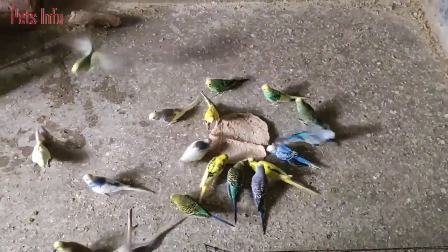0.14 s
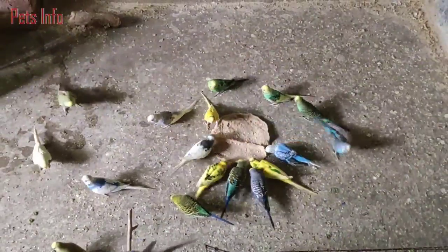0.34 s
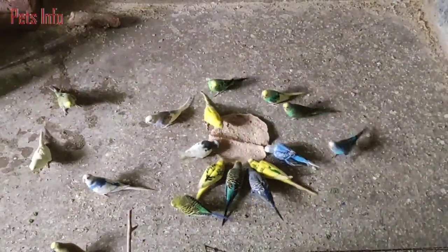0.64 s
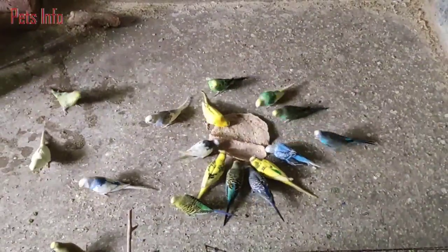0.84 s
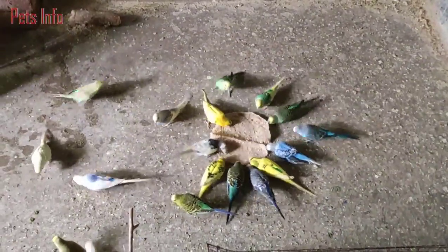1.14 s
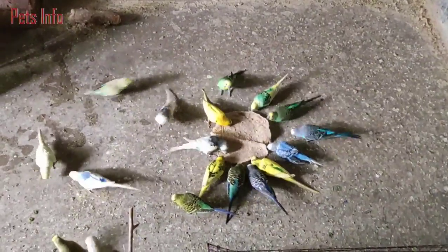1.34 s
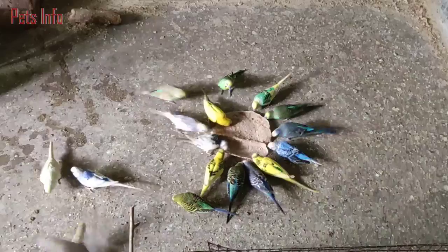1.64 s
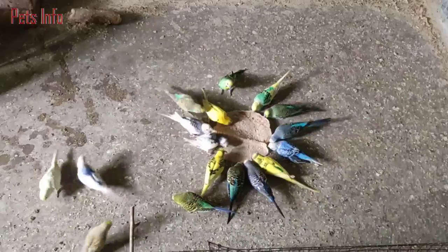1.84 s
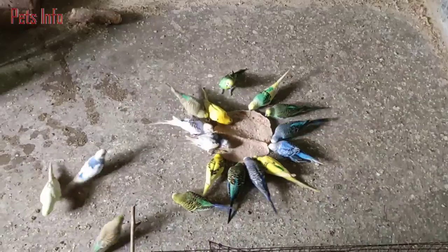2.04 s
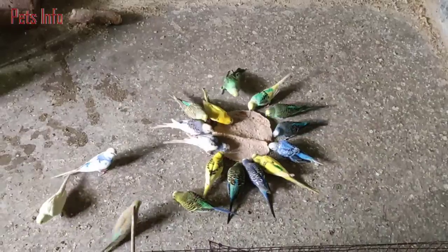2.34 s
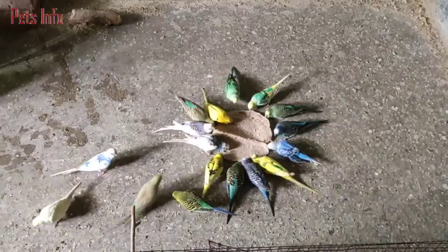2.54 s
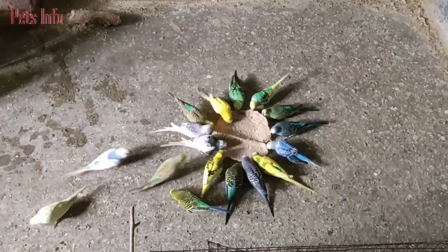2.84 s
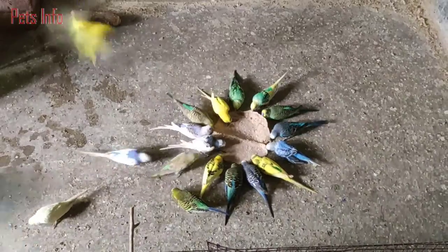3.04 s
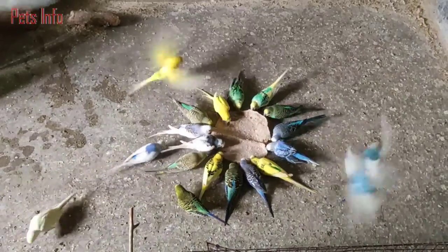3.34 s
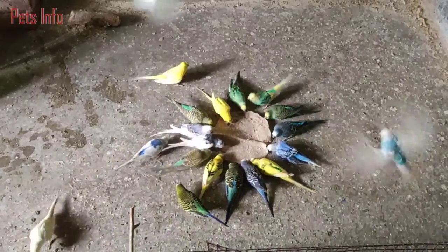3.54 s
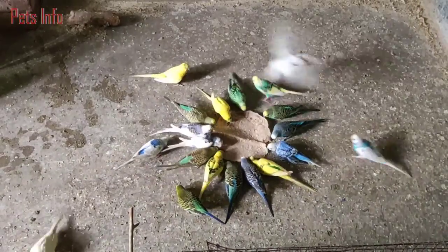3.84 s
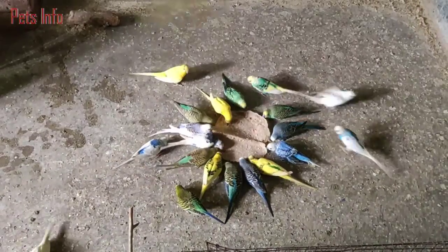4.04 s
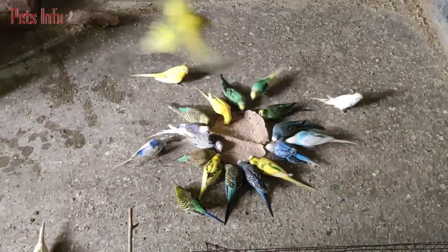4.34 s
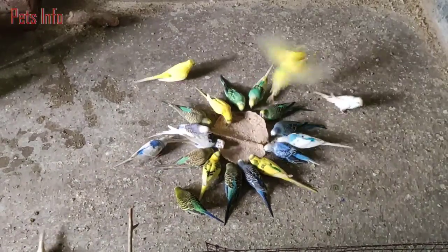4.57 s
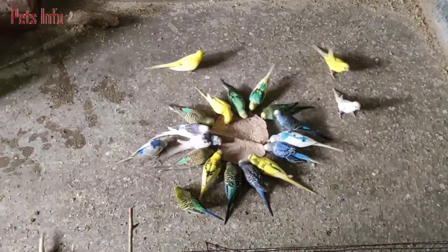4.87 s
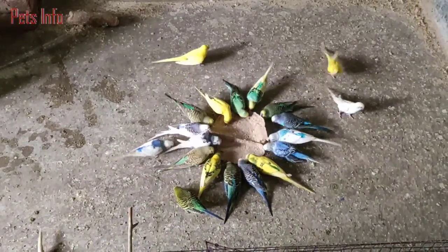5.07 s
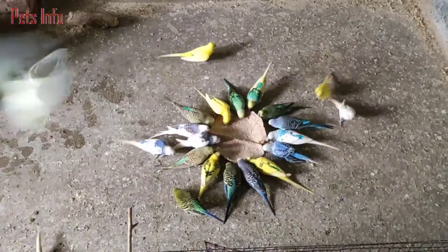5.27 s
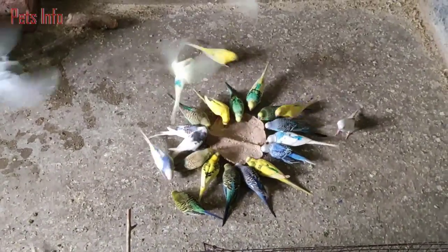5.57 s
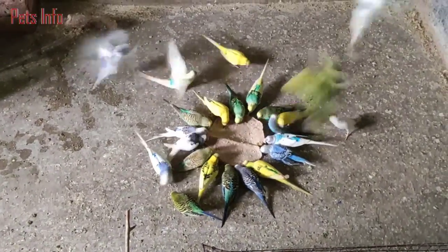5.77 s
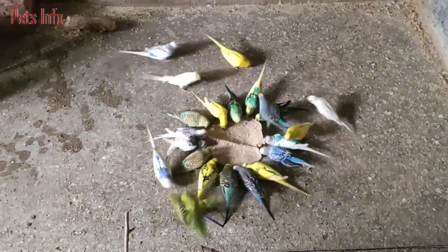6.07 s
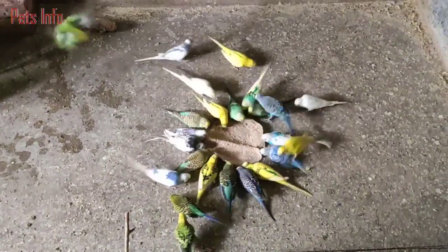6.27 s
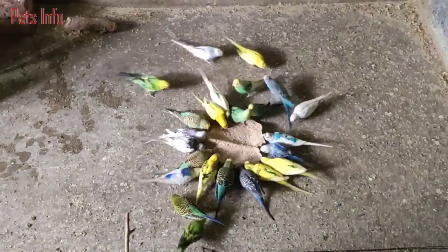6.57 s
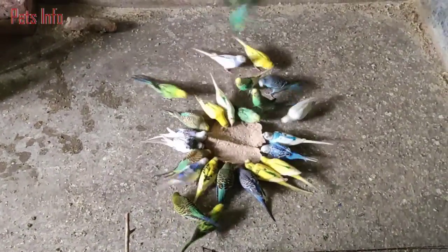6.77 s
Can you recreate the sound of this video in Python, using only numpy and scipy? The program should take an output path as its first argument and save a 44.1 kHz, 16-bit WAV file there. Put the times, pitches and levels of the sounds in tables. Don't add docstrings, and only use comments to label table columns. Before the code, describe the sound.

A flock of small parrots chirps, chatters and squawks in a hard-walled concrete room, with low wing flutter and one close wingbeat gust.

```python
import sys
import numpy as np
from scipy import signal
from scipy.io import wavfile
from scipy.ndimage import uniform_filter1d

SR = 44100
rng = np.random.default_rng(int(sys.argv[2]) if len(sys.argv) > 2 else 0)


def gain_from_db(level_db):
    decades = np.asarray(level_db, float) / 20
    return 10 ** decades


def dump_mix(stems):
    frames = np.atleast_2d(stems).T
    limited = np.clip(frames, -1, 1)
    pcm = np.round(limited * 32767).astype(np.int16)
    wavfile.write(sys.argv[1], SR, pcm)


N = 304731

# t/s, room drive level/dB, feather rush level/dB, lean towards the upper modes/dB
WING_ACTIVITY = [(0.0, -39, -34.5, -7), (0.33, -34, -39, 1.5), (0.71, -30, -39.5, -9),
                 (1.48, -32, -42.5, -10.5), (2.0, -37, -41.5, 2), (3.12, -33.5, -44, -2.5),
                 (3.41, -45, -46.5, 4), (3.85, -42.5, -45, -0.5), (4.0, -37.5, -47, -5),
                 (4.2, -32, -46.5, 1), (4.68, -44, -46.5, 0), (4.98, -43.5, -51.5, -3),
                 (5.7, -44.5, -44.5, -1.5), (6.74, -65, -49.5, 3.5), (6.91, -57, -53.5, 2)]


def evened(x):
    return x / np.sqrt(np.mean(x ** 2) + 1e-20)


def read(points, hz):
    f, value = np.transpose(points)
    return np.interp(np.log(hz + 1), np.log(f + 1), value)


def curve(rows, column):
    rows = np.array(rows)
    return gain_from_db(np.interp(np.arange(N) / SR, rows[:, 0], rows[:, column]))


def add(mix, s, sound, pan_db):
    part = mix[:, round(s * SR):][:, :len(sound)]
    part += sound[:part.shape[1]] * gain_from_db(np.array([[pan_db / 2], [-pan_db / 2]]))


def resonate(x, hz, width):
    r = np.exp(-np.pi * width / SR)
    return 2 * signal.lfilter([1 - r], [1, -r * np.exp(2j * np.pi * hz / SR)], x + 0j).real


def wander(size, span):
    return evened(uniform_filter1d(uniform_filter1d(rng.standard_normal(size), span), span))


def air(spectrum, patchy_db):
    # f/Hz, left-right correlation
    likeness = [(60, .84), (290, .8), (640, .5), (1400, -.1), (15000, 0)]
    frames, hz = N // 512 + 5, np.fft.rfftfreq(2048, 1 / SR)
    a, b, c, d, patches = rng.standard_normal((frames, 1025, 5), dtype=np.float32).T
    patches = evened(uniform_filter1d(uniform_filter1d(patches, 24, 0), 6, 1))
    same = np.clip(read(likeness, hz), -1, 1)[:, None]
    left = a + 1j * b
    right = same * left + np.sqrt(1 - same ** 2) * (c + 1j * d)
    z = np.array([left, right]) * gain_from_db(read(spectrum, hz)[:, None] + patchy_db * patches)
    return evened(signal.istft(z, nperseg=2048, noverlap=1536)[1][:, :N])


def note(length, start_hz, end_hz, wobble, trill):
    size = round((length + .006) * SR)
    hz = np.linspace(start_hz, end_hz, size) * (1 + wobble * wander(size, 90))
    phase = 2 * np.pi * np.cumsum(hz) / SR
    press = gain_from_db(6.0 * (np.clip(start_hz, 3200, 4700) - 3200) / 1000)
    harmonics = gain_from_db(-24) * np.sin(2 * phase) + gain_from_db(-30) * np.sin(3 * phase)
    tone = np.sin(phase) + press * harmonics
    swell = np.interp(np.arange(size) / size, [0, .22, 1 - .31, 1], [0, 1, 1, 0])
    return tone * (1 + trill * wander(size, 60)) * swell


def walls(x, lag, direct_db):
    # f/Hz, reverberation time t60/s
    decay_times = [(1000, 1.7), (4000, 0.65), (8000, 0.56), (15000, 0.17)]
    taps, first, onset_s = np.zeros((2, SR)), 200, 0.0013
    at = np.arange(first, SR - 20, 20) + rng.integers(0, 20, (2, (SR - 21 - first) // 20 + 1))
    np.put_along_axis(taps, at, rng.choice([-1., 1.], at.shape), 1)
    hz, t, z = signal.stft(taps, SR, nperseg=256)
    tail = signal.istft(z * gain_from_db(-60 * t / read(decay_times, hz)[:, None]), SR, nperseg=256)[1]
    tail *= 1 - np.exp(-np.arange(tail.shape[1]) / SR / onset_s)
    tail /= np.linalg.norm(tail[0])
    tail[[0, 1], [max(lag, 0), max(-lag, 0)]] += gain_from_db(direct_db)
    return signal.fftconvolve(x, tail, axes=1)[:, :N]


def chatter(count=450):
    # f/Hz, level/dB
    pitch_spread = [(2150, -9), (2400, -3.5), (2800, 0.5), (3700, 0), (4300, -7.5)]
    out, hz = np.zeros((2, N)), np.geomspace(2150, 4300, 200)
    share = np.cumsum(gain_from_db(read(pitch_spread, hz)))
    for s, pick, length, glide, loud, side in rng.random((count, 6)):
        pitch = np.interp(pick * share[-1], share, hz)
        end_hz = pitch * (.85 + 0.3498 * glide)
        call = note(.01 + .03 * length, pitch, end_hz, wobble=0.032, trill=1.0)
        add(out, s * N / SR, gain_from_db(5.0 * loud) * call, 15.0 * (side - .5))
    return evened(out)


def far_flock():
    # t/s, whistled chatter level/dB, rasping chatter level/dB
    activity = [(0.0, -62, -33.5), (0.81, -30, -30.5), (2.0, -41.5, -33.5), (2.33, -42, -33.5),
                (3.73, -32, -33.5), (4.43, -31.5, -39), (4.85, -32.5, -31), (5.3, -29.5, -33),
                (5.52, -28.5, -37), (5.8, -36, -37), (6.15, -40, -41), (6.52, -37, -43),
                (6.91, -23.5, -28.5)]
    # f/Hz, spectral level/dB per Hz
    rasp_spectrum = [(880, -28.5), (1500, -3), (2780, 1.5), (3660, 3.5), (4950, -1.5), (8080, -6),
                     (14500, -17.5), (15600, -10)]
    whistles = evened(walls(chatter(), 0, -5.0)) * curve(activity, 1) * gain_from_db(1.5)
    rasping = air(rasp_spectrum, patchy_db=3.5) * curve(activity, 2) * gain_from_db(3.0)
    return whistles + rasping


def feather_rush(beats_hz=16., beat_depth=0.042):
    # f/Hz, spectral level/dB per Hz
    rush_spectrum = [(11, -35), (18, -7), (43, -5), (72, -28.5), (91, -11), (122, -3), (151, -21.5),
                     (177, -11.5), (273, -18.5), (397, -14), (474, -17.5), (555, -21.5), (1110, -23.5),
                     (1740, -27), (2000, -26.5), (2600, -17), (4400, -120)]
    rush = air(rush_spectrum, patchy_db=0.5) * curve(WING_ACTIVITY, 2) * gain_from_db(7.5)
    return rush * (1 + beat_depth * np.sin(2 * np.pi * beats_hz * np.arange(N) / SR))


def room_hum():
    # f/Hz, width/Hz, level/dB, share of the lean followed
    modes = [(33.93, 3.7, 4, 0), (64.1, 13.5, 2, 0.92), (118, 22, -9, .6)]
    out = np.zeros((2, N))
    for hz, width, db, leans in modes:
        shared, left, right = rng.standard_normal((3, N))
        drive = shared + .4 * np.array([left, right])
        hum = resonate(resonate(drive, hz, width), hz, width)
        steady = np.sqrt(uniform_filter1d(hum[0] ** 2, 5000) + 0.14 * np.mean(hum ** 2))
        out += hum / steady * gain_from_db(db) * curve(WING_ACTIVITY, 1) * curve(WING_ACTIVITY, 3) ** leans
    return out


def voice_pan_db(hz):
    return np.clip(5.5 - 3 * (hz / 1000 - 3), 1.5, 9.)


def clear_whistles():
    # t/s, length/s, start f/Hz, end f/Hz, level/dB
    clear_notes = [(0.478, 0.021, 3520, 3480, -20.5), (1.372, 0.024, 2863, 3046, -25),
                   (1.38, 0.069, 4286, 3816, -19), (1.595, 0.011, 4960, 4930, -31),
                   (3.444, .011, 3585, 3560, -19), (3.449, 0.03, 6770, 6560, -24.5),
                   (3.526, 0.0205, 3365, 3550, -27), (3.78, 0.014, 4140, 4090, -23),
                   (3.957, 0.067, 2740, 2967, -30.5), (4.426, 0.024, 3070, 2820, -31.5),
                   (4.416, .07, 4196, 3855, -25.5), (4.664, 0.042, 2900, 3250, -16),
                   (4.742, 0.034, 3250, 3000, -22), (1.178, .035, 3620, 3720, -22.5),
                   (5.265, .04, 3100, 2650, -27.5), (5.2, .025, 2550, 2700, -31),
                   (5.02, 0.016, 3300, 3250, -28), (2.795, .035, 3650, 3450, -24.5),
                   (5.108, 0.045, 3060, 3000, -27.5), (5.445, 0.019, 3340, 4200, -27),
                   (5.971, .022, 2650, 2720, -26), (6.78, 0.02, 3130, 3330, -19.5),
                   (.032, 0.032, 2900, 2850, -28), (.072, 0.034, 2800, 3650, -24.5),
              (.518, .03, 2500, 2950, -25), (0.83, 0.0343, 3250, 3880, -22), (.797, .012, 3800, 2900, -25),
              (1.172, .01, 4050, 4300, -24), (2.9, .01, 3600, 4300, -25), (4, 0.0163, 3150, 3850, -21),
              (.636, .026, 2950, 4100, -23), (1.143, 0.0297, 3300, 3780, -18),
              (3.278, .035, 2650, 3400, -25.5), (3.715, 0.0394, 4050, 4150, -19),
              (3.63, 0.3, 1340, 1400, -47), (6.6, .006, 5550, 5500, -29), (1.085, 0.03, 2950, 3050, -30),
              (1.2, .035, 4050, 4000, -32), (4.29, 0.05, 2950, 2890, -30), (1.43, 0.039, 2300, 1800, -33.5)]
    calls = []
    for s, length, start_hz, end_hz, db in clear_notes:
        call = gain_from_db(db + 2.0) * note(length, start_hz, end_hz, wobble=.0081, trill=.55)
        calls.append((s, call, voice_pan_db(max(start_hz, end_hz))))
    return calls


def burry_warbles():
    # t/s, length/s, start f/Hz, level/dB
    rising = [(.096, 0.04, 3554, -19), (.12, .03, 3890, -23.5), (.14, 0.036, 3350, -23.5),
              (.378, 0.029, 2500, -30), (.415, 0.045, 2720, -24), (.742, .03, 2950, -23),
              (.83, 0.029, 3380, -21.5), (.84, 0.022, 3800, -25), (1.128, 0.036, 2949, -17),
              (1.252, .015, 3700, -29), (2.708, 0.053, 3525, -25), (3.31, 0.034, 3350, -20),
              (1.797, 0.014, 2764, -28), (1.83, 0.053, 3415, -25), (1.862, 0.031, 3960, -26),
              (1.872, 0.022, 3056, -21.5), (2.648, 0.031, 3450, -23.5), (3.005, 0.02, 3670, -23),
              (3.55, 0.054, 2760, -25), (3.662, 0.01, 2740, -24), (3.683, .015, 2706, -25.5),
              (3.693, 0.023, 3815, -15), (4.002, 0.093, 3090, -28.5), (4.17, 0.055, 2877, -26.5),
              (4.878, 0.02, 3600, -32), (4.983, 0.03, 3910, -22.5), (5.067, 0.038, 3850, -24.5),
              (5.225, 0.07, 2956, -20.5), (5.29, 0.042, 3260, -23), (5.359, 0.029, 3440, -22),
              (5.561, 0.02, 3154, -26.5), (5.87, 0.018, 2620, -26), (6.12, .07, 3700, -35),
              (6.05, .04, 3800, -33), (5.3, .05, 2750, -27), (3.93, .07, 4000, -31),
              (6.375, 0.037, 2800, -34), (6.3, .08, 1697, -39.5), (6.579, 0.034, 2755, -26.5),
              (6.79, 0.067, 3185, -21), (6.856, 0.031, 3320, -14)]
    # t/s, length/s, start f/Hz, level/dB
    sinking = [(.129, 0.043, 2990, -24), (.493, 0.013, 2510, -24.5), (.643, 0.04, 3860, -23),
               (.19, 0.037, 3800, -26), (.24, 0.025, 3010, -27.5), (.992, 0.04, 2880, -33),
               (1.188, 0.047, 3074, -19), (1.27, 0.033, 3050, -25.5), (2.535, 0.013, 4000, -25),
               (2.611, 0.034, 3020, -30.5), (2.74, .04, 3900, -27), (3.032, 0.017, 2800, -25.5),
               (3.11, 0.017, 3970, -21), (3.052, 0.042, 3550, -21), (3.3, 0.06, 4200, -17.5),
               (3.342, 0.039, 3632, -12.5), (3.385, 0.042, 3446, -20.5), (3.748, 0.032, 3550, -19),
               (4.13, 0.018, 3700, -23), (4.115, .05, 2750, -29), (1.19, .07, 2500, -27),
               (1.29, .05, 2500, -30), (5.16, .07, 2150, -31), (4.64, .05, 2450, -29),
               (4.155, 0.011, 3330, -17), (4.192, .03, 3800, -25), (4.454, 0.046, 3833, -23.5),
               (4.551, 0.021, 3720, -19), (4.724, 0.012, 3510, -17), (4.723, 0.0087, 2930, -18.5),
               (5.279, 0.086, 2870, -27), (5.47, .02, 4300, -22), (5.43, .045, 4760, -19),
               (5.49, 0.037, 4736, -22.5), (.46, .02, 3510, -27), (.51, .05, 3510, -24.5),
               (.5, .06, 2350, -29.5), (.745, .06, 2204, -31), (3.37, 0.053, 4150, -22),
               (3.38, .05, 2794, -27.5), (3.59, 0.037, 2400, -28), (3.76, .04, 3950, -21),
               (.87, 0.045, 3050, -27.5), (4.2, 0.034, 3303, -23.5), (3.44, 0.055, 2400, -33),
               (5.833, 0.03, 3510, -32), (6.227, 0.024, 3225, -30), (6.3, 0.032, 2410, -32.5),
               (6.48, 0.057, 1402, -41.5), (6.57, .09, 1450, -43), (6.655, .05, 2694, -25.5),
               (6.818, 0.021, 3640, -20)]
    calls = []
    for rows, hz_per_s in [(rising, 2290), (sinking, -2500)]:
        for s, length, start_hz, db in rows:
            end_hz = start_hz + hz_per_s * length
            call = gain_from_db(db - 1.5) * note(length, start_hz, end_hz, wobble=.02, trill=.85)
            calls.append((s, call, voice_pan_db(max(start_hz, end_hz))))
    return calls


def squawk(length, beak_hz, width, clicks_per_s=4500., spread_db=3.0):
    # f/Hz, width/Hz, level/dB
    throat = [(3700, 1400, -3), (10000, 4000, -12)]
    size = round(length * SR)
    when, strength, sign = rng.random((size, 3)).T
    loudness = gain_from_db(-spread_db * np.log(strength + 0.0006))
    clicks = (when < clicks_per_s / SR) * np.sign(sign - .5) * loudness
    voiced = evened(resonate(resonate(clicks, beak_hz, width), beak_hz, 1.83 * width))
    broad = np.clip(width / 13000.0, 0, 1)
    voiced = voiced + broad * sum(gain_from_db(db) * evened(resonate(clicks, f, w)) for f, w, db in throat)
    voiced = signal.sosfilt(signal.butter(3, 2200, "high", fs=SR, output="sos"), voiced)
    voiced = voiced * np.maximum(1 + 0.42 * wander(size, 100), 0)
    t = np.arange(size) / SR
    opening = t / min(0.0021, length / 4)
    closing = (1 - t / length) / 0.31
    return evened(voiced) * np.clip(np.minimum(opening, closing), 0, 1)


def harsh_calls():
    # t/s, length/s, beak f/Hz, level/dB
    screeches = [(.113, 0.0055, 7200, -20), (.632, 0.02, 6600, -27), (2.175, 0.055, 5200, -19.5),
                 (2.31, 0.082, 4800, -24.5), (2.538, 0.033, 4800, -25.5), (2.705, 0.06, 5660, -22.5),
                 (2.945, 0.025, 5450, -27), (3.038, 0.04, 4700, -23.5), (3.455, 0.014, 7800, -21.5),
                 (4.01, 0.027, 7150, -32.5), (4.585, 0.054, 6300, -22.5), (4.69, 0.03, 5540, -24.5),
                 (4.855, 0.11, 6260, -21.5), (4.93, 0.06, 5170, -22), (5.45, 0.026, 6500, -29),
                 (5.78, 0.092, 6450, -44), (5.865, 0.1, 5240, -35), (6.05, 0.017, 7460, -40),
                 (6.196, .006, 11000, -45), (6.231, 0.0098, 2900, -28), (6.482, 0.014, 6400, -31.5),
                 (6.622, 0.07, 9500, -24), (6.695, 0.087, 10500, -24.5), (6.77, 0.089, 6500, -31)]
    # t/s, length/s, beak f/Hz, level/dB
    half_open = [(.69, 0.11, 5200, -28), (1.42, 0.023, 5060, -25.5), (1.525, 0.025, 6000, -25.5),
                 (1.62, 0.078, 5550, -32), (1.93, 0.059, 5800, -32), (2.1, 0.082, 7100, -36),
                 (3.34, 0.15, 7100, -35.5), (3.46, .032, 11200, -35), (3.7, .03, 7200, -47),
                 (4.44, 0.24, 6130, -38.5), (5.11, 0.072, 5600, -32.5), (6.625, 0.024, 6500, -23),
                 (6.725, 0.07, 12500, -26.5)]
    # t/s, length/s, beak f/Hz, level/dB
    squeaks = [(.345, 0.025, 9000, -34.5), (1.68, 0.071, 5700, -33.5), (2.548, 0.015, 5300, -25),
               (5.085, 0.085, 5850, -36.5), (5.375, 0.046, 6740, -34.5), (6.635, 0.028, 4930, -19),
               (6.675, .02, 5300, -23), (2.01, .036, 6540, -31), (2.19, 0.034, 6270, -25),
               (2.44, 0.014, 5800, -24), (4.17, 0.041, 5900, -36.5), (6.69, .025, 4750, -17.5),
               (6.69, .035, 9860, -28), (6.698, 0.057, 6450, -22)]
    calls = []
    for rows, share, snap_cycles in [(screeches, 0.48, 13), (half_open, 0.33, 0), (squeaks, 0.1, 0)]:
        for s, length, hz, db in rows:
            width = share * hz + snap_cycles / length
            calls.append((s, gain_from_db(db + 3.) * squawk(length, hz, width), 1.9))
    return calls


def piercing_whistles():
    # t/s, length/s, f/Hz, level/dB
    piercing = [
        (.676, .058, 3043, -19.5),
        (5.398, 0.08, 4680, -23),
        (6.742, 0.066, 4135, -9.5),
    ]
    return [(s, gain_from_db(db) * note(length, hz, hz, wobble=0.0032, trill=0.39))
            for s, length, hz, db in piercing]


def near_birds():
    perch_lag = [14, -8, 4]
    perches, close = np.zeros((3, 2, N)), np.zeros((2, N))
    clear, burry = clear_whistles(), burry_warbles()
    for k, (s, call, pan_db) in enumerate(clear + burry):
        close_db = -6.5 if k < len(clear) else -9.
        add(perches[k % 3], s, call, pan_db)
        add(close, s, gain_from_db(close_db) * call, pan_db)
    for k, (s, call, pan_db) in enumerate(harsh_calls()):
        add(perches[k % 3], s, call, pan_db)
    for k, (s, call) in enumerate(piercing_whistles()):
        add(close, s, call, 5.)
        add(perches[k % 3], s, gain_from_db(-4.5) * call, 6.)
    return close + sum(walls(calls, lag, direct_db=-3.5) for calls, lag in zip(perches, perch_lag))


def passing_gusts():
    # t/s, peak level/dB, pulse length/s, sign and scale (positive pushes first)
    gusts = [
        (3.982, -21, 0.011, 1),
        (4.041, -15, 0.012, 1),
        (4.098, -17, 0.0072, 0.98),
        (4.212, -15.5, 0.0022, -1.04),
        (4.246, -11, 0.0074, -0.75),
        (4.346, -22, 0.0058, -1.1),
    ]
    out = np.zeros((2, N))
    for s, db, length, sign in gusts:
        u = np.arange(-3 * length, 3 * length, 1 / SR) / length
        add(out, s - 3 * length, -sign * gain_from_db(db) * 2.0 * u * np.exp(-u ** 2), 1.5)
    return out


def scene():
    flock = far_flock() * gain_from_db(np.array([[1.5], [-1.5]]))
    wings = feather_rush() + room_hum() + passing_gusts()
    return flock + near_birds() + wings * gain_from_db(np.array([[.7], [-.7]]))


def band_limit(x):
    return signal.sosfilt(signal.butter(12, 15710, fs=SR, output="sos"), x)


def record(dry):
    hiss = gain_from_db(-64.) * np.diff(rng.standard_normal((2, N + 1)))
    return band_limit(np.clip(dry + hiss, -1, 1))


dry = scene()
out = record(dry)
dump_mix(out)
```